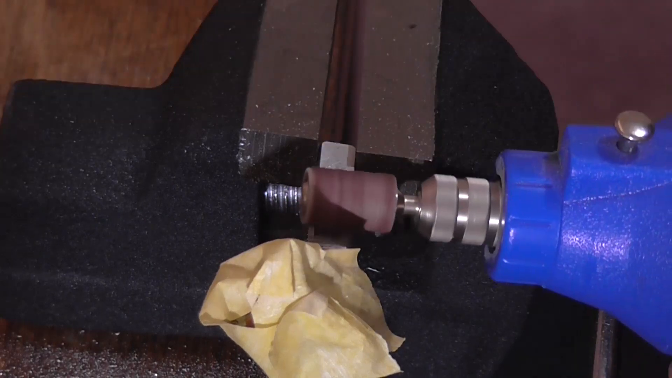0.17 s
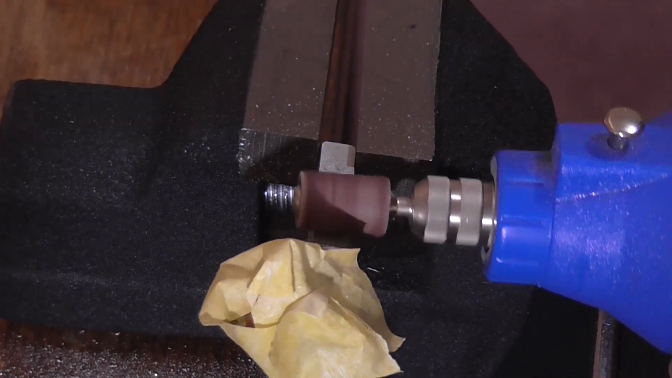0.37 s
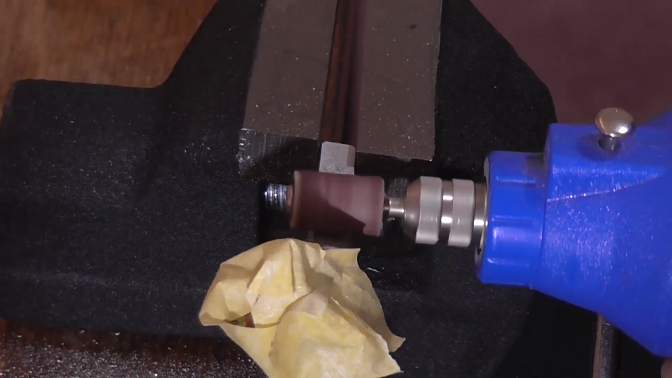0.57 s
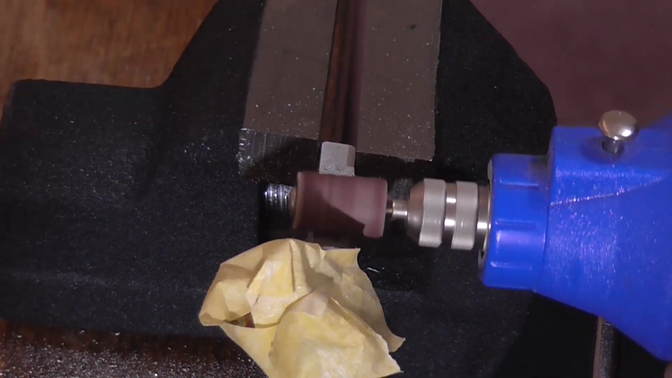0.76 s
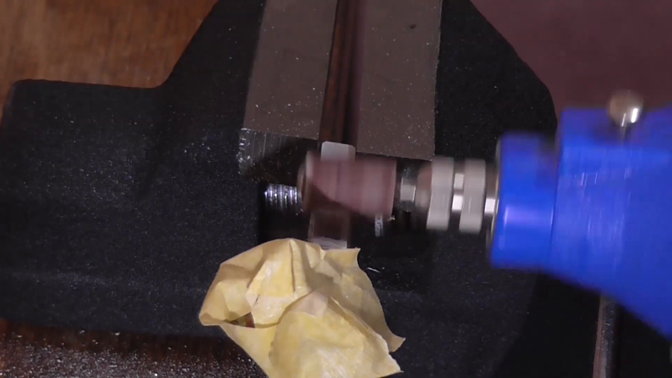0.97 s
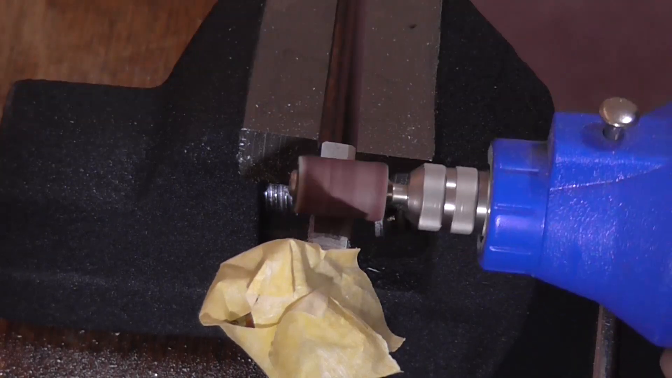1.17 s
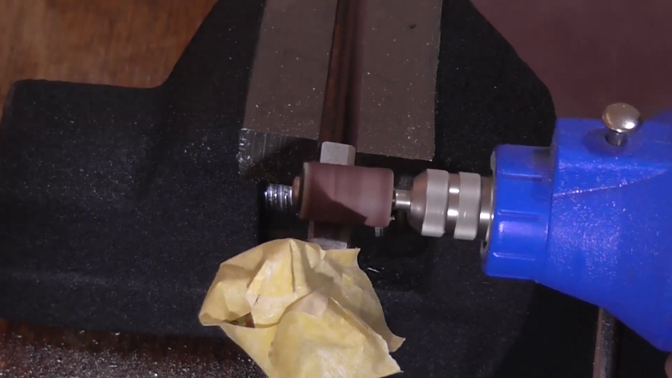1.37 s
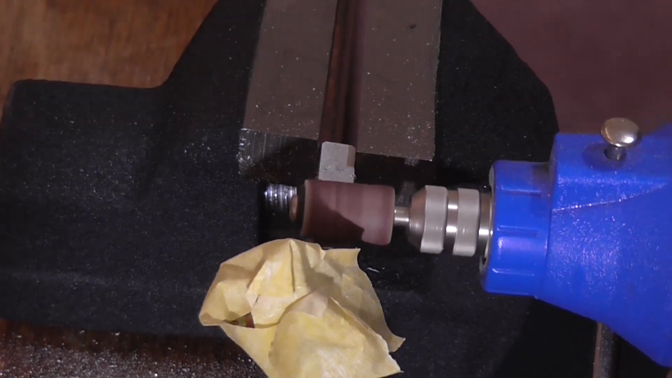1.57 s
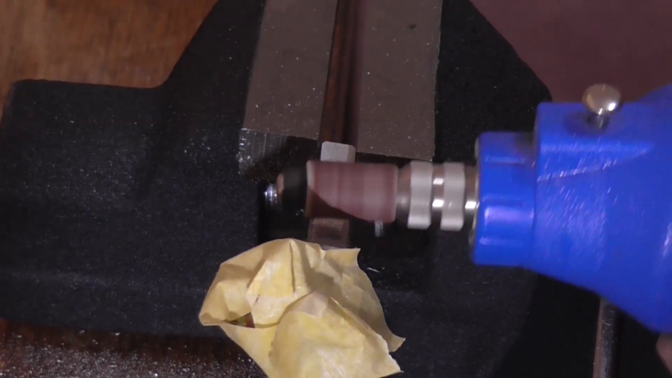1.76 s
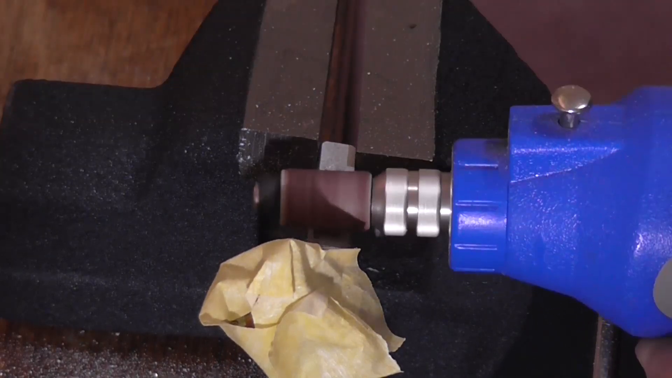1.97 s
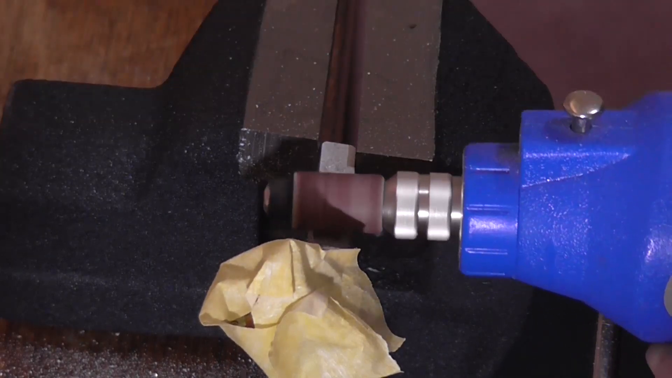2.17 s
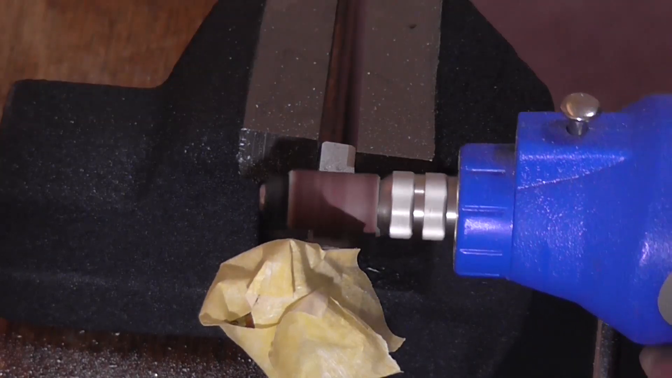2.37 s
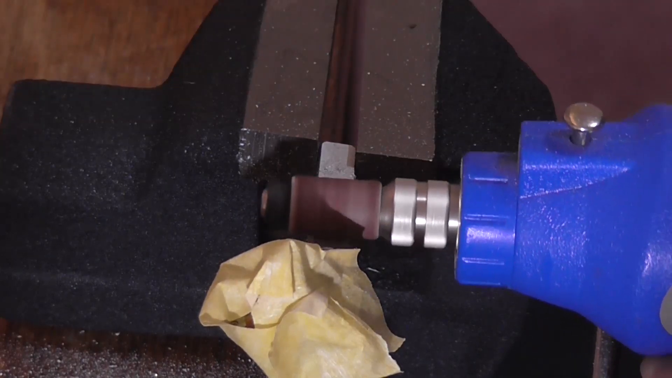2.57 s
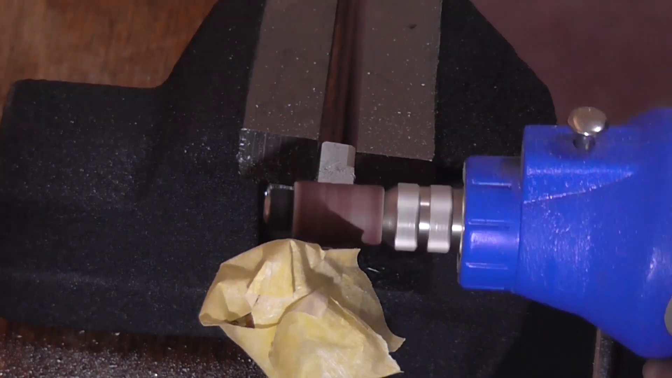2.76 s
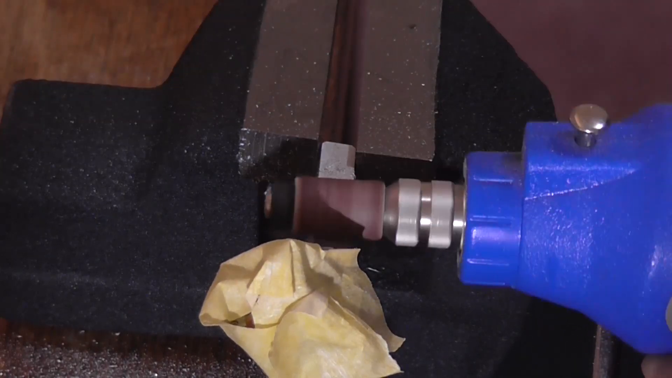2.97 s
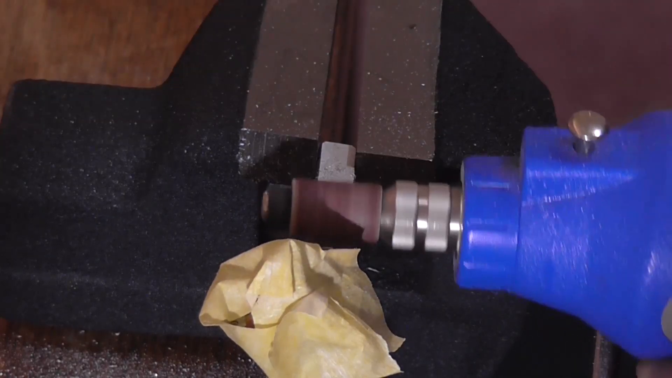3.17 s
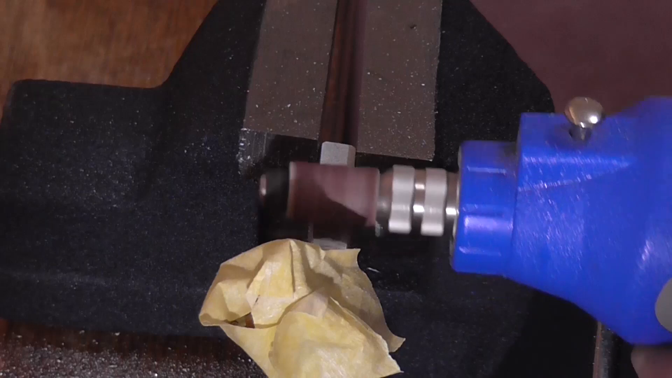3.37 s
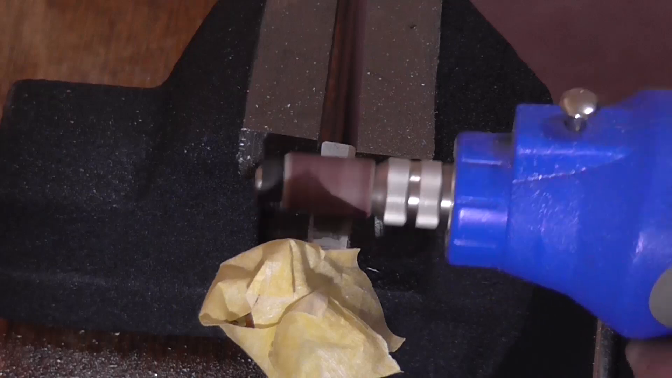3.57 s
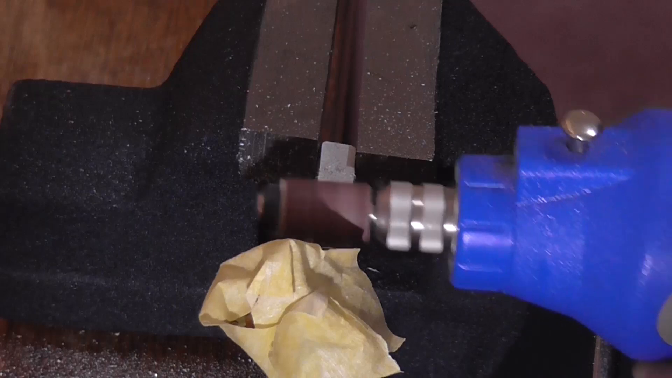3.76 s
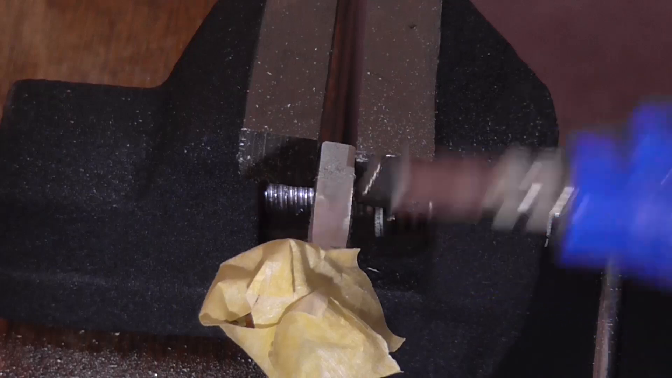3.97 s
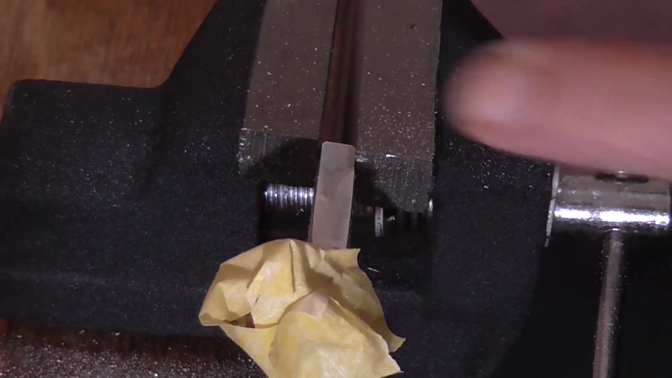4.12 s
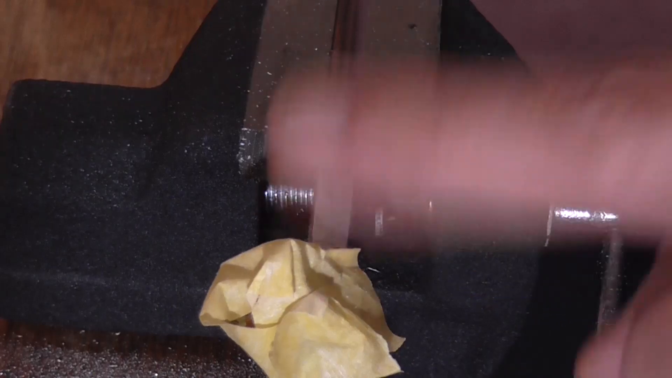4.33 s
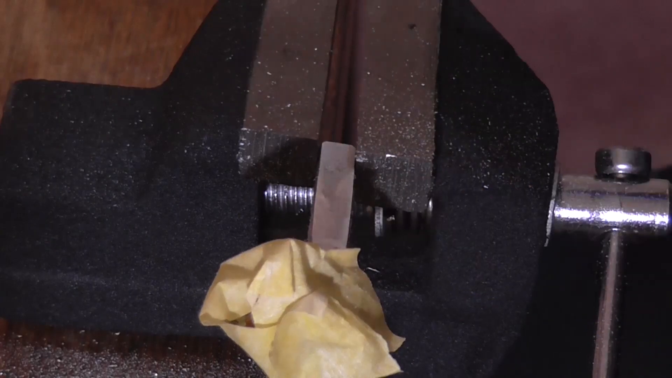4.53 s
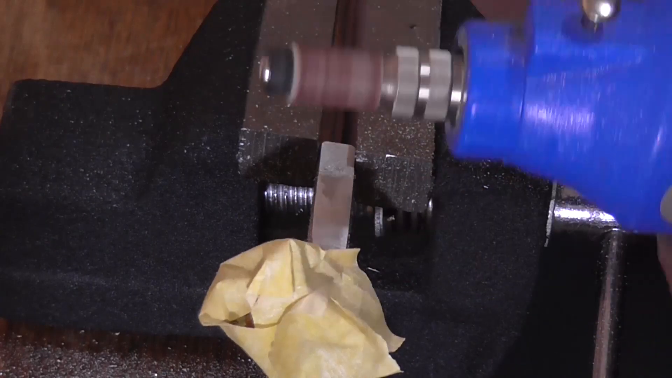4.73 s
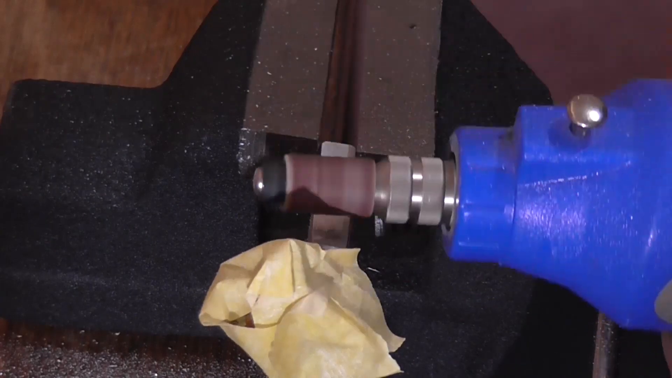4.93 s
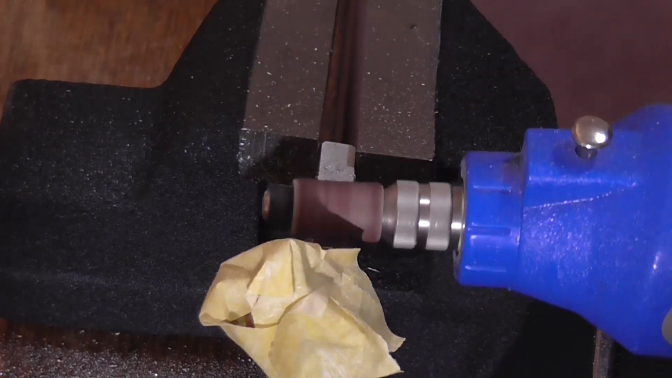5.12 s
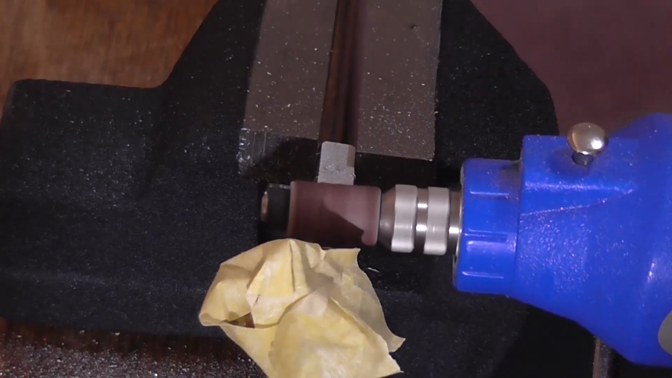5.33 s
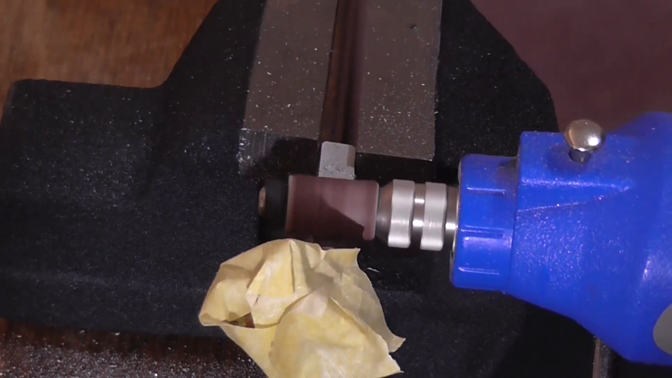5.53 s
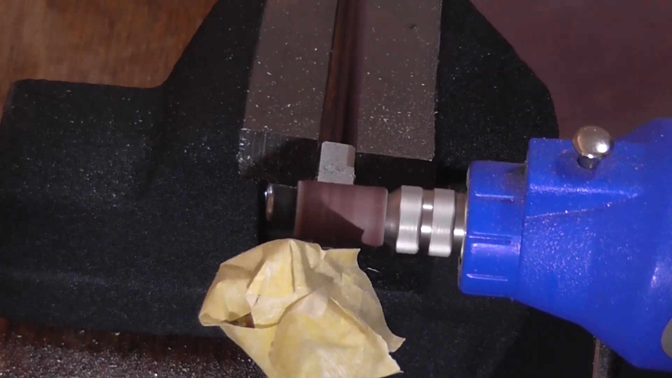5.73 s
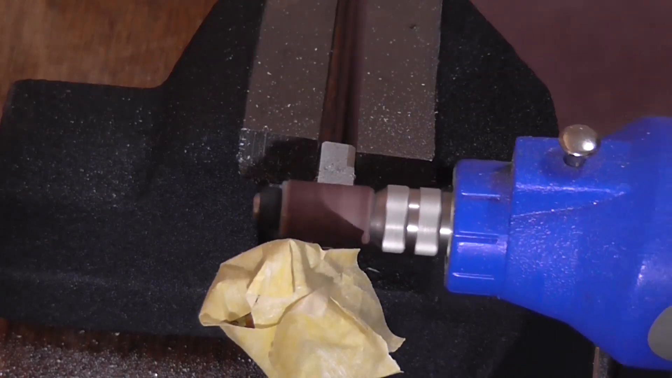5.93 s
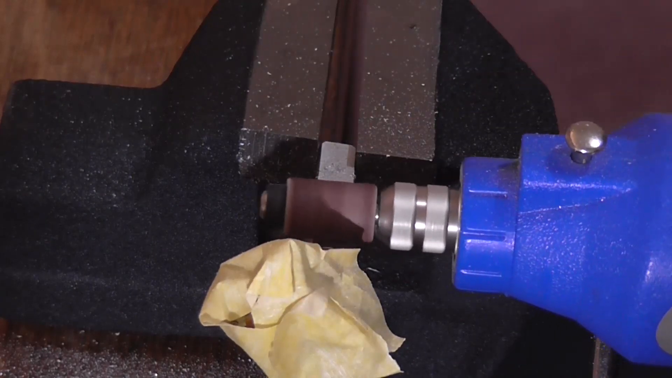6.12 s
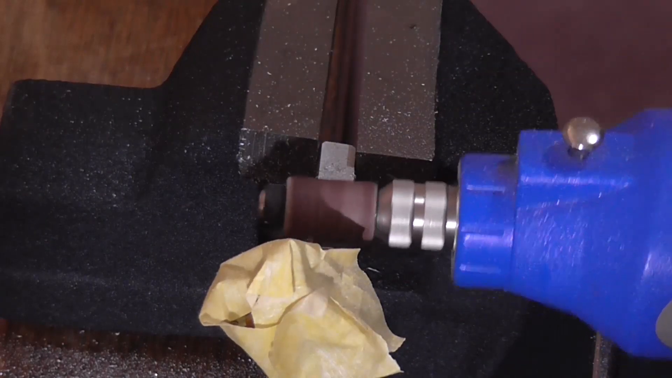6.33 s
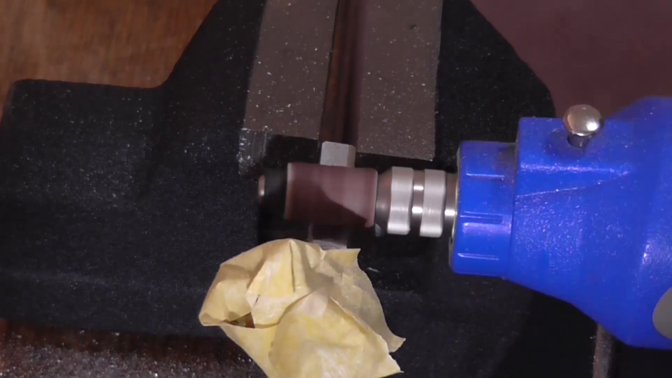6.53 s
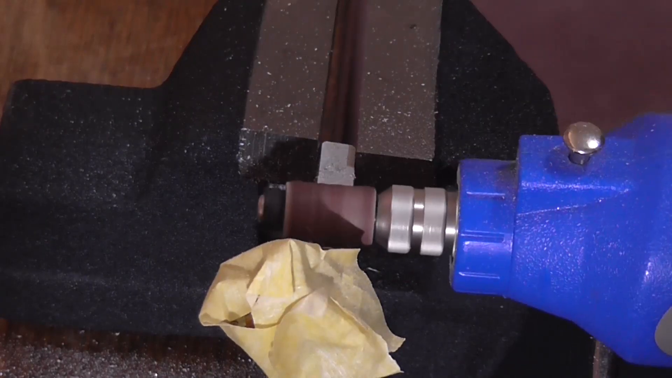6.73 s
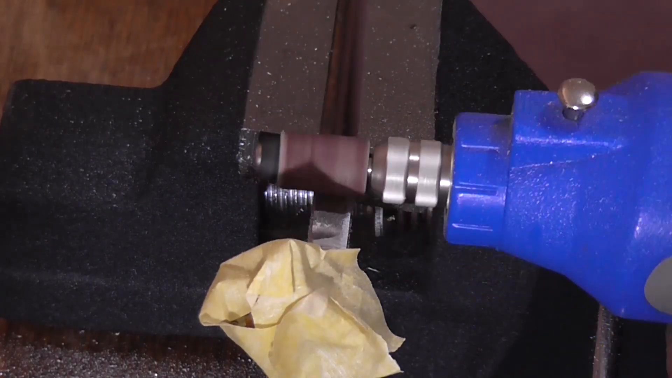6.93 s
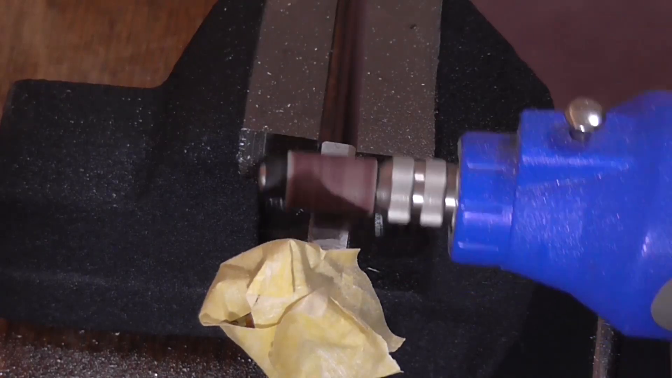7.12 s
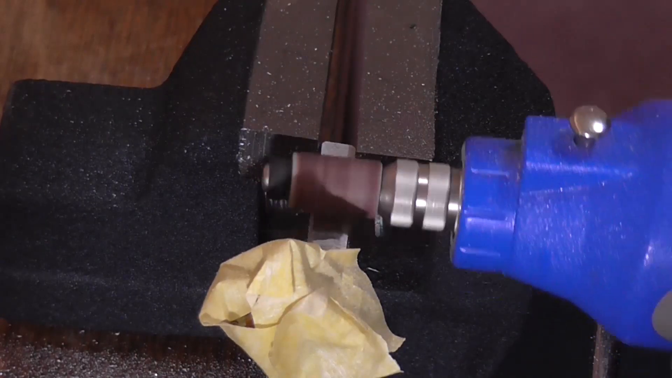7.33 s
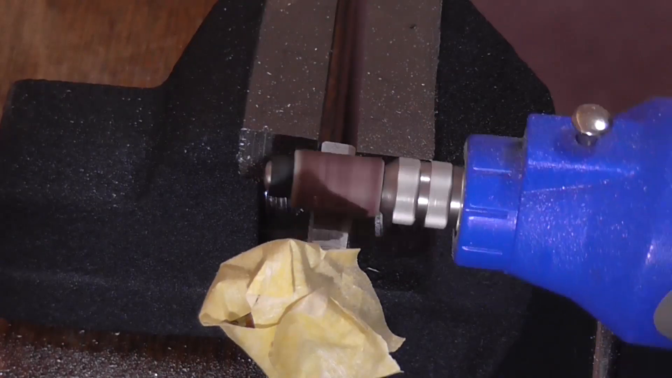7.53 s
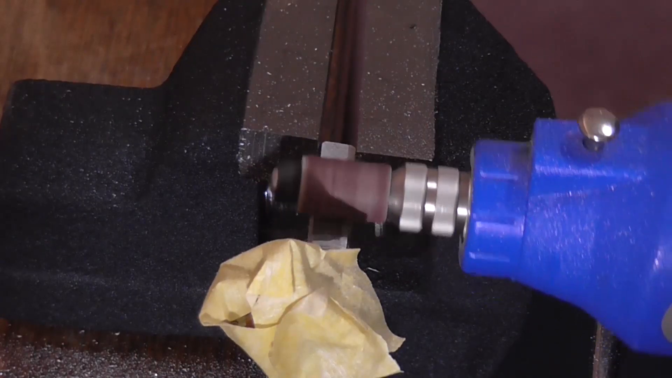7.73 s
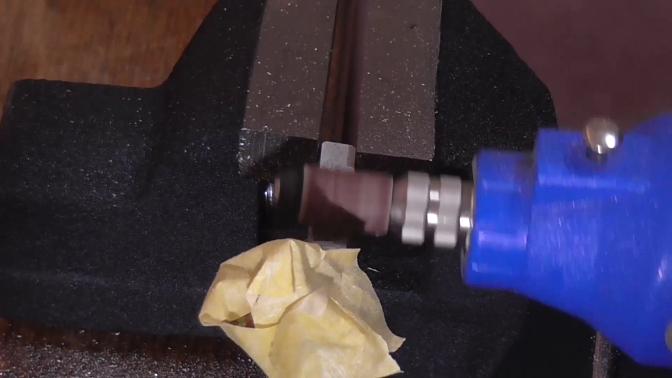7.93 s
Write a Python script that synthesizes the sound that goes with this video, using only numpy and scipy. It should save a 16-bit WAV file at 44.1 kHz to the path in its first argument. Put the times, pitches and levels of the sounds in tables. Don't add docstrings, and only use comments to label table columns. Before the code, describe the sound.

A small high-speed rotary tool whines while its sanding drum grinds a steel part in a vise in uneven, buzzing strokes, close up.

```python
import sys
import numpy as np
from scipy import signal
from scipy.fft import rfft, irfft, next_fast_len
from scipy.io import wavfile
from scipy.ndimage import uniform_filter1d, map_coordinates

SR = 44100
rng = np.random.default_rng(int(sys.argv[2]) if len(sys.argv) > 2 else 0)


def master_out(mix):
    frames = np.transpose(np.atleast_2d(mix))
    ceiling = np.clip(frames, -1, 1)
    pcm = np.round(ceiling * 32767).astype(np.int16)
    wavfile.write(sys.argv[1], SR, pcm)


def convert_level_to_amplitude(level_db):
    exponent = np.asarray(level_db, float) / 20
    return 10 ** exponent


N = 352359

# time in seconds, shaft speed in turns per second.
STROKE_SPEEDS = [
    [(0.15, 444.5), (0.41, 444.1), (0.47, 431.7), (0.71, 428.3), (0.81, 410.1), (0.97, 415.7),
     (1.07, 424.3)],
    [(1.28, 439.1), (1.48, 417.0), (1.6, 432.6), (1.64, 422.4), (1.83, 410.5)],
    [(1.99, 443.1), (2.08, 425.0), (2.69, 376.7), (2.73, 409.6), (3.02, 441.1), (3.06, 401.4), (3.1, 401.3),
     (3.99, 391.0), (4.06, 451.7)],
    [(5.27, 453.3), (5.45, 417.2), (5.74, 384.3), (5.78, 403.3), (6.01, 383.9), (6.27, 396.4),
     (6.38, 382.4), (6.45, 401.6)],
    [(6.61, 437.3), (6.87, 397.7), (7.09, 414.5), (7.16, 384.2), (7.26, 420.7), (7.36, 372.3),
     (7.44, 397.0), (7.89, 383.4), (7.99, 425.5)],
]
# time in seconds, level in dB, left minus right in dB.
WHINE = [(0, -32.5, -3.5), (1.2, -32, -3), (1.9, -32, -1.5), (4.1, -31.5, -3.5), (4.3, -33.5, -4),
         (4.6, -33.5, -4), (4.82, -31.5, -3.5), (5, -33.5, -4), (5.25, -31.5, -3.5), (6.5, -35, -3),
         (8, -25.5, -5)]
# centre in Hz, width in Hz, level in dB.
VISE_MODES = [(189, 11, -3), (419.6, 19.5, 9.5), (503, 10.3, 6)]
# centre in Hz, width in Hz, level in dB.
JAW_MODES = [(668.4, 11.3, 8), (778, 68, -1.5), (869, 24, 3.5), (1042, 47, -9)]


def unit(x):
    return x / np.sqrt(np.mean(x ** 2) + 1e-20)


def along(points, hz):
    f, v = np.transpose(points)
    return np.interp(np.log(hz + 1), np.log(f + 1), v)


def curves(rows):
    s, *cols = np.transpose(rows)
    return [np.interp(np.arange(N) / SR, s, c) for c in cols]


def wobble(rate):
    knots = rng.standard_normal(int(N * rate / SR) + 4)
    return map_coordinates(knots, [np.arange(N) * rate / SR])


def filtered(x, response):
    m = next_fast_len(N + SR // 2)
    return irfft(rfft(x, m) * response(np.fft.rfftfreq(m, 1 / SR)), m)[..., :N]


def ringing(x, modes):
    def body(f):
        total = 0
        for k, (centre, width, db) in enumerate(modes):
            damping = 1j * f * width
            total = total + (-1) ** k * convert_level_to_amplitude(db) * damping / (centre * centre - f * f + damping)
        return total
    return filtered(x, body)


def hiss(spectrum, channels=1):
    noise = rng.standard_normal((channels, N))
    return unit(filtered(noise, lambda hz: convert_level_to_amplitude(along(spectrum, hz))))


def shop():
    # frequency in Hz, density in dB per Hz.
    air_spectrum = [(25, -26), (60, -23), (110, -4.5), (150, -21), (200, -0.5), (300, -6.5), (500, -5.5),
                    (1000, -5.5), (2000, -28), (4000, -43)]
    # time in seconds, level in dB.
    vehicle = [
        (4.5, -97),
        (4.6, -73),
        (4.8, -80),
        (4.9, -88),
        (7.4, -95),
        (7.6, -80),
        (7.95, -67),
    ]
    drone_hz = 108 + 3 * wobble(5.9)
    drone_level = convert_level_to_amplitude(curves(vehicle)[0] + 1.5 * wobble(7.8))
    drone = np.sin(2 * np.pi * np.cumsum(drone_hz) / SR) * drone_level
    drift_db = 1.5 * wobble(5)
    return convert_level_to_amplitude([[-69], [-67]] + drift_db) * hiss(air_spectrum, channels=2) + drone


def walls(x):
    # frequency in Hz, time to fall 60 dB in seconds.
    decay = [(300, .15), (3000, .1), (12000, .06)]
    hz, t, z = signal.stft(rng.standard_normal((2, SR // 2)), SR, nperseg=256)
    dying = z * convert_level_to_amplitude(-60 * t / along(decay, hz)[:, None])
    tail = signal.istft(dying, SR, nperseg=256)[1]
    late = np.pad(x, (200, 0))[None]
    return signal.fftconvolve(late, tail / np.linalg.norm(tail[0]), axes=1)[:, :N]


def knocks():
    # start in seconds, level in dB, time to fall 60 dB in seconds.
    blows = [
        (4.449, -46, 0.12),
        (4.469, -44, 0.14),
        (5.435, -50, 0.06),
    ]
    t, puff = np.arange(N) / SR, rng.standard_normal(N)
    shape = sum(convert_level_to_amplitude(db - 60 * np.clip(t - s, 0, 1) / t60) * (t > s) for s, db, t60 in blows)

    def bench(hz):
        low_cut = (hz / 260) ** 4 / (1 + (hz / 260) ** 4)
        return low_cut / (1 + (hz / 800) ** 2)
    dull = unit(filtered(puff, bench))
    return convert_level_to_amplitude(-7) * shape * dull + convert_level_to_amplitude(11.5) * ringing(shape * puff, VISE_MODES + JAW_MODES)


def motor(turns, touch, load):
    # time in seconds, level in dB.
    grazes = [
        (0.1114, -26),
        (4.0994, -18),
        (4.1374, -15),
        (4.2294, -20),
        (4.29, -21),
        (4.3724, -16.5),
        (4.6994, -21),
        (4.8394, -21),
    ]
    # time in seconds, then collet, vents, chuck and housing in dB.
    poses = [(.1, 6, 4, -1, 2), (1, 0, -2, 4, 0), (4.05, 0, -2, 4, 0), (4.16, -1, 12, -4, -4),
             (4.58, -1, 13, -4, -4), (4.7, 1, 5, 4, 2), (4.87, 1, 4, 4, 2), (4.96, -1, 1, 0, 2),
             (5.06, 3, -2, 7, 0), (5.3, 3, -2, 7, 0), (6.4, -7, -4, -7, 4)]
    openings = [
        (4, 6, 10, 12),
        (1, 7, 19),
        (9, 17, 26, 28),
        (5, 25, 30),
    ]
    order_levels = [-35, -20, -22, -11, -4, -6, -12, -14, -6, -19, -24, -23, -25, -18, -9, -18, -18, -21,
                    -23, -20, -19, -18, -17, -19, -4, -12, -14, -16, -16, -11, -16, -21, -23, -18]
    # frequency in Hz, density in dB per Hz.
    fan_spectrum = [(120, -50), (900, -5), (2500, -4), (4300, 3), (5500, -20), (6600, -3), (9000, -4),
                    (11500, 3), (15800, -5)]
    t = np.arange(N) / SR
    facing = {k: db for orders, db in zip(openings, curves(poses)) for k in orders}
    hiccup = sum(convert_level_to_amplitude(db + 22) * np.exp(-0.5 * ((t - s) / 0.009) ** 2) for s, db in grazes)
    tones = 0
    for k, order_db in enumerate(order_levels, 1):
        tremor = (0.01 + 0.12 * touch + 0.08 * hiccup) * wobble(90)
        level_db = order_db + (facing[k] if k in facing else 1.8 * wobble(1.48))
        unsteady_db = np.clip(1.5 - 0.15 * level_db, 2.2, 3) + 1.5 * touch
        level_db = level_db + unsteady_db * wobble(48)
        tones = tones + convert_level_to_amplitude(level_db) * np.sin(2 * np.pi * (k * turns + tremor + rng.random()))
    air = hiss(fan_spectrum)[0] * (1 + 0.8 * np.cos(2 * np.pi * turns))
    air_db = -18.5 + 4 * touch + 2.6 * wobble(35) + 3 * hiccup
    tones_db = -2.5 - 9.7 * touch - 14.4 * load
    return convert_level_to_amplitude(curves(WHINE)[0]) * (convert_level_to_amplitude(tones_db) * tones + convert_level_to_amplitude(air_db) * air)


def shaft():
    # time in seconds, turns per second.
    idle_speed = [(0, 451), (1.1, 452), (5.3, 452), (6.5, 455.5)]
    # time in seconds, speed lost in turns per second (below 0 it eases off),
    # length in seconds.
    pushes = [(0.274, 22.2, 0.07), (1.342, -13.2, 0.05), (1.382, -21.9, 0.1), (1.741, 10.8, 0.07),
              (2.125, 11.8, 0.1), (2.315, -11.0, 0.07), (2.355, -8.0, 0.14), (2.385, -16.4, 0.05),
              (2.415, 10.0, 0.05), (2.494, -15.6, 0.1), (2.564, -9.9, 0.1), (2.854, 14.1, 0.1),
              (2.913, 29.5, 0.14), (2.963, 18.6, 0.05), (3.183, -31.4, 0.07), (3.372, -26.0, 0.07),
              (3.412, 14.7, 0.05), (3.522, -20.9, 0.1), (3.572, 14.4, 0.05), (3.612, -10.2, 0.05),
              (3.712, -19.1, 0.14), (3.881, -25.2, 0.1), (5.403, -10.4, 0.14), (5.662, -14.4, 0.07),
              (5.852, 15.9, 0.07), (6.061, -13.0, 0.1), (6.725, -12.4, 0.1), (7.553, 26.2, 0.1),
              (7.653, -20.0, 0.07), (7.822, -22.1, 0.07)]
    spin_s = 0.02
    t = np.arange(N) / SR
    rocking = 0
    for s, lost, length in pushes:
        rocking = rocking + lost * np.cos(np.pi * np.clip((t - s) / length, -0.5, 0.5)) ** 2
    pressed = sum((t > k[0][0]) * (t < k[-1][0]) * 1.0 for k in STROKE_SPEEDS[:-1])
    pressed = pressed + (t > STROKE_SPEEDS[-1][0][0])
    pressed = uniform_filter1d(pressed, int(spin_s * SR))
    idle, leaned = curves(idle_speed)[0], curves(np.concatenate(STROKE_SPEEDS))[0]
    return idle + pressed * (leaned - rocking - idle), rocking


def contact(load, rocking):
    # time in seconds, level in dB.
    cuts = [
        [(0.15, -31), (0.248, -33), (0.264, -27.5), (0.36, -36), (0.372, -32), (0.692, -29), (0.976, -29),
         (1.054, -32), (1.07, -34)],
        [(1.28, -26.5), (1.3, -32.5), (1.376, -34), (1.396, -31), (1.51, -30), (1.602, -31), (1.614, -28.5),
         (1.816, -29), (1.83, -32.5)],
        [(1.99, -34.5), (2.08, -29), (2.93, -27.5), (2.99, -33.5), (3.07, -26), (3.18, -31), (3.22, -28.5),
         (4.0, -29), (4.06, -36)],
        [(5.27, -28), (5.302, -34), (5.43, -29), (6.156, -28.5), (6.216, -33), (6.236, -27), (6.256, -31),
         (6.442, -30.5), (6.45, -33.5)],
        [(6.61, -30), (6.636, -30), (6.874, -31.5), (6.894, -33.5), (6.952, -27), (7.052, -31.5), (7.058, -29),
         (7.912, -27.5), (7.99, -28.5)],
    ]
    # vise in dB on landing, vise in dB on lifting, jaws in dB.
    seating = [
        (-1, -8.5, -6.5),
        (-5, -9.5, -6),
        (-9.5, -6, -7.5),
        (-6.5, -12.5, -9.5),
        (-17.5, -5.5, -11.5),
    ]
    land_s, lift_s = 0.007, 0.018
    vise_lag_s = 0.15
    t, touch, jolt, seats = np.arange(N) / SR, np.zeros(N), np.zeros(N), []
    for stroke, (land_db, lift_db, jaw_db) in zip(STROKE_SPEEDS, seating):
        start, end = stroke[0][0], stroke[-1][0]
        since = t - start
        touch += np.clip(since / land_s + 1, 0, 1) * np.clip((end - t) / lift_s + 1, 0, 1)
        jolt += (since > -0.004) * np.exp(-np.abs(since) / 0.037)
        seats += [(start, land_db, jaw_db), (end, lift_db, jaw_db)]
    hop_hz = 30 * (1 + 0.262 * wobble(6))
    hops = np.cos(2 * np.pi * np.cumsum(hop_hz) / SR)
    vise_db, jaw_db = curves(seats)
    cut_db = curves(np.concatenate(cuts))[0]
    vise_db = vise_db + uniform_filter1d(cut_db, int(vise_lag_s * SR)) - cut_db
    push_db = -0.0238 * rocking
    cut = touch * convert_level_to_amplitude(cut_db - 0.97 + push_db + 0.6 * hops + 1.02 * wobble(60))
    thump = cut * convert_level_to_amplitude(vise_db + 6 * (load - 0.5) + 0.73 * wobble(12))
    clang = cut * convert_level_to_amplitude(jaw_db + 10.5 * (load - 0.5) + 2 * hops)
    fizz = cut * convert_level_to_amplitude(-5.5 - 4 * load)
    return (cut, thump, clang, fizz), touch, jolt


def vise_and_jaws(turns, load, snatch, thump, clang, jolt):
    angle = 2 * np.pi * turns
    rattle = (1 + 1.6 * load + 1.3 * snatch) * rng.standard_normal((2, N))
    shake = np.cos(angle) + 1.5 * rattle[0]
    vise = ringing(thump * shake, VISE_MODES) / np.std(ringing(shake, VISE_MODES))
    landing = unit(ringing(jolt * rng.standard_normal(N), VISE_MODES[-1:]))
    twice_a_turn = np.cos(2 * angle + 0.7 * wobble(40)) * convert_level_to_amplitude(1.8 * wobble(50))
    jaw = unit(ringing(twice_a_turn + 1.2 * (0.05 + load) * rattle[1], JAW_MODES))
    return convert_level_to_amplitude(6.0) * vise + convert_level_to_amplitude(-50.5) * landing + clang * convert_level_to_amplitude(1.0) * jaw


def grit(turns, memory, fresh, size=80):
    kept = np.exp(-1 / max(memory, 0.1))
    surface = signal.lfilter([1], [1, -kept], rng.standard_normal((4000, size)), axis=0)
    worn = unit(map_coordinates(surface.ravel(), [turns * size]))
    fresh = np.clip(fresh, 0, 1)
    return np.sqrt(1 - fresh) * worn + np.sqrt(fresh) * rng.standard_normal(N)


def grinding(turns, load, slip, snatch, cut, fizz):
    # centre in Hz, width in Hz, level in dB.
    part_modes = [(1301, 73, -11), (1480, 68, -9), (1685, 87, -6), (2099, 139, 0.5), (2248, 420, -3),
                  (2800, 243, -3), (3076, 100, -2.5), (3493, 263, -1.5), (4183, 350, -2.5),
                  (4465, 375, -4.5), (6617, 850, -6.5), (6990, 470, -4), (7665, 230, -3.5), (8414, 204, -3),
                  (9660, 680, -8)]
    # frequency in Hz, density in dB per Hz.
    fizz_spectrum = [(5590, -5), (9500, 2), (10400, -1), (12100, 5), (14100, -0.5), (15100, 3),
                     (15800, -41)]
    bite = unit(np.exp(0.3 * np.cos(2 * np.pi * turns)))
    chips = 0.02 + 0.28 * load ** 1.3 + 0.14 * snatch + 0.3 * slip
    part = unit(ringing(bite * grit(turns, memory=12, fresh=chips), part_modes))
    scrape = bite * grit(turns, memory=8, fresh=0.3 + chips)
    sparks = unit(filtered(scrape, lambda hz: convert_level_to_amplitude(along(fizz_spectrum, hz))))
    return cut * convert_level_to_amplitude(2.18) * part + fizz * convert_level_to_amplitude(3.0) * sparks


def scene():
    speed, rocking = shaft()
    load = np.clip((453 - speed) / 80, 0, 1)
    (cut, thump, clang, fizz), touch, jolt = contact(load, rocking)
    slip = np.clip(uniform_filter1d(np.abs(np.gradient(speed)) * SR / 900, 600), 0, 1)
    judder = 1 + touch * (0.002 + 0.007 * load) * wobble(60) + 0.0003 * wobble(20)
    turns = np.cumsum(speed * judder) / SR
    snatch = np.clip(wobble(40) - 0.3, 0, 2)
    part = grinding(turns, load, slip, snatch, cut, fizz)
    vise = vise_and_jaws(turns, load, snatch, thump, clang, jolt)
    whine = motor(turns, uniform_filter1d(touch, 400), load)

    def small(hz):
        return (1j * hz / 290 / (1 + 1j * hz / 290)) ** 6
    part, vise = filtered(np.array([part, vise]), small)
    vise = vise + knocks()

    pan_db = curves(WHINE)[1]
    direct = part * convert_level_to_amplitude([[-0.3], [0.3]]) + vise * convert_level_to_amplitude([[-1.9], [1.6]])
    direct = direct + whine * convert_level_to_amplitude(np.array([pan_db, -pan_db]) / 2)
    echo = filtered(part + 0.5 * vise + 0.45 * whine, lambda hz: 1 / (1 + 1j * hz / 9000))
    return direct + convert_level_to_amplitude(-10.5) * walls(echo) + shop()


def band_limit(x):
    return signal.sosfilt(signal.butter(12, 16880, fs=SR, output="sos"), x)


def record(dry):
    mix = filtered(dry, lambda hz: hz < 15850)
    return band_limit(mix)


dry = scene()
out = record(dry)
master_out(out)
```